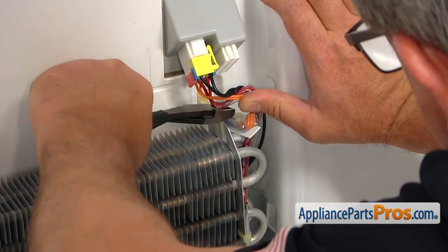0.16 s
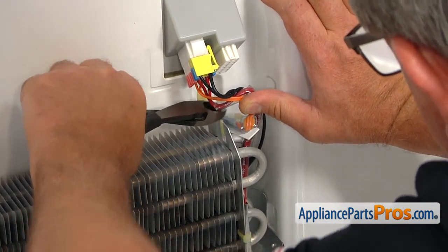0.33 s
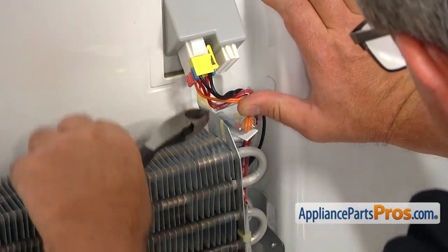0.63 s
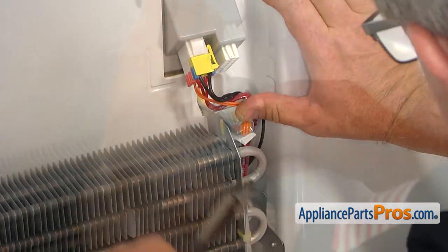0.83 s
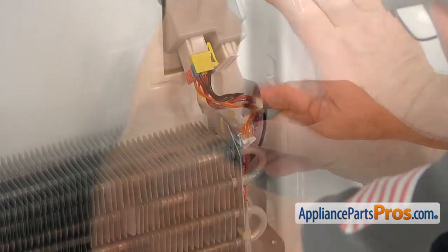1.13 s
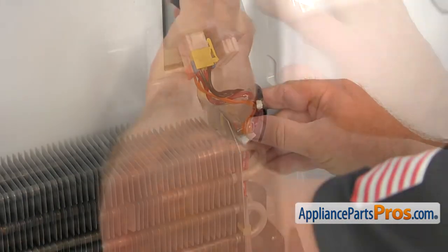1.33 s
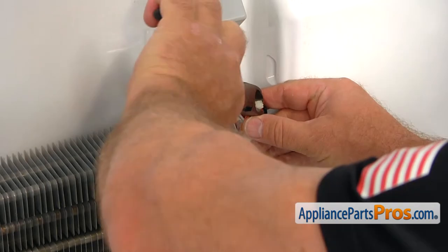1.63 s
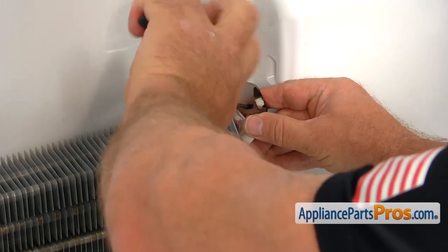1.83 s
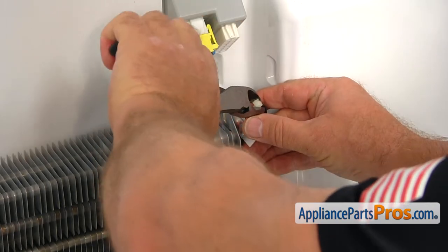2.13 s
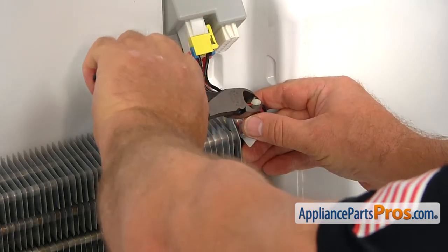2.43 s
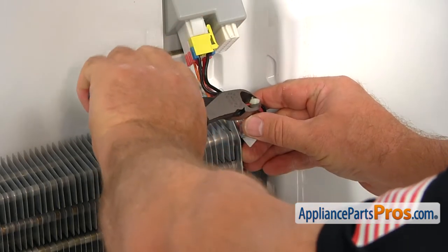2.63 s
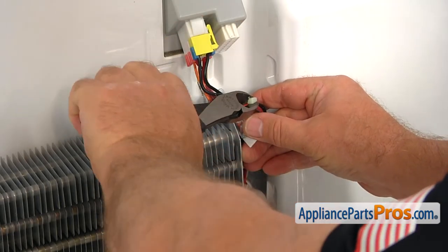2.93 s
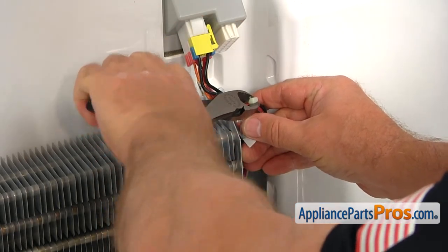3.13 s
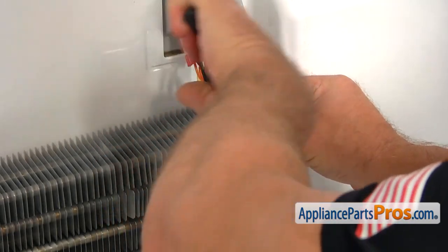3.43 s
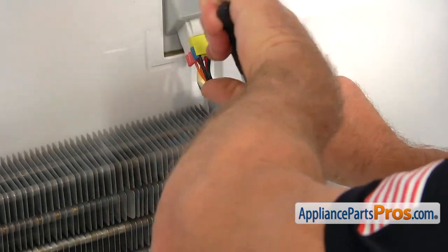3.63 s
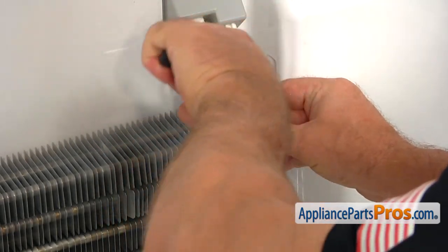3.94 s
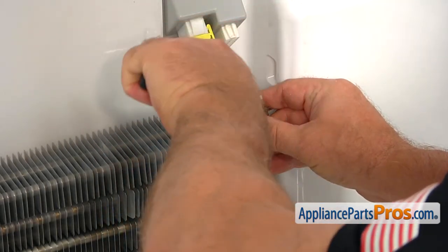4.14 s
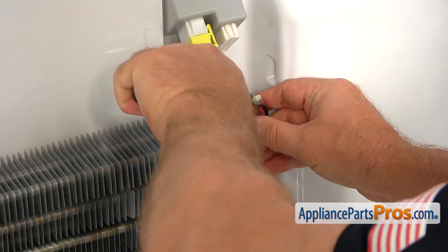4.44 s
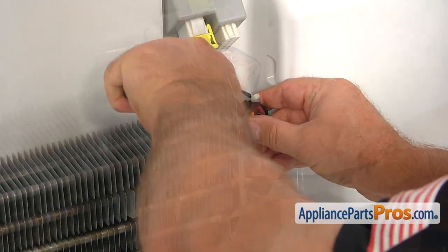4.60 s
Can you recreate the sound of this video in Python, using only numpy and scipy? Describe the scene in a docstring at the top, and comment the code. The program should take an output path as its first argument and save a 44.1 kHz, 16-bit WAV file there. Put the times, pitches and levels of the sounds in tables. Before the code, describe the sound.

Close inside an empty refrigerator compartment, side cutters snap a plastic tie almost immediately, with a hard bright crack, short boxy echo and faint coil ring. Hands then bump and rub the liner, with small tool ticks, muted hollow knocks and thin wire rustling, getting quieter. A second sharp double snap comes just before the end. Light steady stereo microphone hiss stays underneath.

```python
"""Side cutters snap two plastic ties inside an empty refrigerator cabinet.
Each snap is a few noise bursts that echo in the cabinet and ring its steel, panels and coil.
Between the snaps, hands shift wires and tool: short noise ticks, hollow ringing knocks,
rubbing and rustling from filtered noise, and a low boom of the cabinet.
A steady microphone hiss lies underneath, partly different on the left and right."""
import sys
import numpy as np
from scipy import signal
from scipy.fft import rfft, irfft
from scipy.io import wavfile

SR = 44100
rng = np.random.default_rng(int(sys.argv[2]) if len(sys.argv) > 2 else 0)


def natural_amplitude(level_db):
    """Convert a level in decibels to a linear amplitude factor, elementwise."""
    exponent = np.asarray(level_db, float) / 20
    return 10 ** exponent


def output_pcm(signal):
    """Save a mono or channel-first signal as 16-bit PCM at the path in sys.argv[1].

    Samples are clipped to [-1, 1] before scaling.
    """
    pcm = np.clip(np.atleast_2d(signal).T, -1, 1) * 32767
    wavfile.write(sys.argv[1], SR, np.round(pcm).astype(np.int16))


N = 210254  # length in samples

# Levels in these tables are relative: the functions below add their own gains.
# The ties part, then jaws and loose ends strike: start_s, crack_db, knock_db, boom_db, fade_ms
SNAP_HITS = [(0.043, -25, -41.5, -45.5, 1.7), (0.0733, -4.5, -24.5, -31.5, 2.2),
             (0.0746, -5, -21, -23, 1.4), (0.0802, -15.5, -26.5, -30.5, 3.9),
             (4.7195, -12.5, -29.5, -29.5, 1.5), (4.7218, -5.5, -26.5, -32.5, 1.7),
             (4.7272, -27, -27, -33.5, 0.77), (4.7325, -10, -34.5, -44, 0.354)]
# Colour of a snap: frequency_hz, level_db
CRACK_COLOUR = [(300, -19), (700, 0), (1900, -16.5), (3200, -2), (4600, 4), (6800, 1), (8800, 5.5),
                (10500, -5.5), (15000, -10), (17000, -6.5)]
# Ringing of the steel jaws and fins: pitch_hz, level_db, time_to_fall_60_db_s
JAW_MODES = [(2374, -8.5, 0.069), (3893, -15.5, 0.093), (4800, -14.5, 0.13), (6000, -13, 0.033),
             (6350, -3, 0.087), (7460, 0.5, 0.1), (8700, -20, 0.087), (9840, -5.5, 0.052),
             (9730, -11.5, 0.093), (10400, -13.5, 0.053), (13610, -13.5, 0.077), (12810, -13, 0.086)]
# Ringing of the cabinet's panels and coil: pitch_hz, level_db, time_to_fall_60_db_s
PANEL_MODES = [(60.4, -17.5, 0.38), (95.9, 2.5, 0.31), (145.53, -19, 0.89), (190, -7.5, 0.058),
               (205.5, -6, 0.31), (230.4, -8.5, 0.25), (297.7, -13, 0.72), (336.2, -14, .5),
               (463.4, -36, 0.26), (542, -38, 1.6), (620.6, -30, 0.27), (634.5, -20, 1.4), (669, -26.5, 1),
               (649.8, -30, 0.47), (710.7, -30, 0.94), (831, -25.5, 0.5), (926, -28, 0.5),
               (920, -31.5, 0.51), (1109, -21.5, 0.11), (1256.7, -33.5, 0.24), (1282, -33.5, 0.24),
               (1562, -27, 0.47), (1599, -33.5, 0.49), (1570, -29.5, .35), (1791, -30.5, .45),
               (1820, -28.5, .45), (2329, -30, 0.35)]
# How long the air in the cabinet echoes: frequency_hz, time_to_fall_60_db_s
CAVITY_DECAY = [(100, 0.14), (300, 0.26), (650, 0.19), (1100, 0.22), (1700, 0.1), (2300, 0.14), (3200, 0.1),
                (5000, .095), (8000, 0.067), (14000, 0.14)]
# Hard wire ends and tool tick on the walls: start_s, level_db, pitch_hz
TICK_HITS = [(0.323, -50.5, 3070), (0.7786, -43, 3530), (0.8131, -45, 5140), (0.8711, -53, 8540),
             (0.9263, -32, 8400), (1.054, -54.5, 4010), (1.301, -59, 5560), (1.4213, -46.5, 3530),
             (1.48, -57.5, 5500), (1.6323, -54.5, 7760), (1.74, -59, 8000), (1.793, -47.5, 5930),
             (1.955, -57, 11000), (2.0621, -50.5, 3500), (2.345, -58, 11000), (2.755, -62, 9000),
             (2.8378, -50, 4420), (3.155, -57.5, 12000), (3.1853, -52, 2346), (3.3092, -53, 3940),
             (3.439, -63.5, 5000), (3.65, -55, 6000), (3.721, -56.5, 7000), (3.892, -52.5, 7790),
             (4.155, -60, 8000), (4.2701, -57.5, 11500), (4.4042, -54.5, 7300), (4.5954, -55, 10400)]
# A wire creaks in quick slips: start_s, length_s, slips_per_s, level_db, pitch_hz
CREAK_RUNS = [(1.108, .05, 150, -53, 2500), (4.035, .09, 70, -59, 7500)]
# Knuckles and tool knock on the liner: start_s, level_db, pitch_hz
KNOCK_HITS = [(0.324, -57, 635), (0.7786, -66, 1674), (0.8126, -63.5, 610.5), (0.925, -57.5, 779),
              (0.9696, -57.5, 576.3), (1.054, -62.5, 507.6), (1.085, -60, 593.5), (1.1083, -65, 1594),
              (1.126, -57.5, 610.1), (1.422, -68, 571.5), (1.6323, -59, 422.7), (1.71, -71.5, 578),
              (1.8973, -60.5, 575.3), (1.9784, -66, 619), (2.0636, -64.5, 343), (2.3254, -58.5, 573.2),
              (2.8376, -68, 788), (2.9939, -74.5, 860), (3.1852, -66, 825.6), (3.3089, -62, 433),
              (3.3666, -61, 407.3), (3.4394, -66.5, 578.5), (3.6558, -69, 498), (3.8198, -70, 573),
              (4.0408, -68.5, 387), (4.1544, -74.5, 594), (4.269, -68, 613.4), (4.4031, -61.5, 600.3),
              (4.5941, -61, 588)]
# Hands shove the cabinet: peak_s, boom_db
SHOVE_PEAKS = [(.19, -33.5), (.29, -45), (.35, -41), (.4, -43.5), (1.03, -36.5), (1.169, -44.5),
               (1.431, -51), (1.789, -46.5), (1.98, -49.5), (2.11, -56.5), (2.47, -54.5), (2.76, -57),
               (2.908, -50), (3.021, -52), (3.33, -63.5), (3.679, -62), (4.67, -49), (4.72, -36.5)]
# Weight leaning on the cabinet: time_s, boom_db
LEAN_CURVE = [(0.0, -52), (0.29, -52.5), (0.4, -64), (0.61, -59.5), (0.77, -61.5), (1.11, -44.5),
              (1.5, -68.5), (1.71, -52.5), (1.84, -57), (1.92, -57.5), (2.08, -63), (2.68, -66.5),
              (2.96, -60), (3.65, -54), (3.95, -64.5), (4.25, -63.5), (4.54, -63), (4.7, -56.5)]
# Hands at work, dragging on the panels and scuffing on the liner: time_s, drag_db, scuff_db
RUB_CURVE = [(0.0, -49.5, -62), (0.16, -53.5, -43.5), (0.25, -56, -55.5), (0.38, -64.5, -63),
             (0.6, -78, -72.5), (0.82, -65, -69.5), (0.99, -56.5, -60), (1.12, -59, -75.5),
             (1.44, -72, -71.5), (1.67, -75.5, -86), (1.83, -66, -69.5), (2.11, -78, -80),
             (2.32, -64.5, -77.5), (2.51, -76.5, -85.5), (2.77, -77, -80.5), (3.23, -70, -72),
             (3.36, -59.5, -67), (3.48, -59, -64), (3.82, -75, -76.5), (4.21, -63.5, -73.5),
             (4.48, -79, -90.5), (4.7, -74, -75.5)]
# Low resonances under the hands: pitch_hz, width_hz, level_db
BOOM_MODES = [(33.2, 87, -5.5), (65, 23, -4), (91.11, 6.4, -6.5), (218.2, 38, -2.5), (318, 47, -11),
              (474, 170, -13.5), (589.3, 58, -13.5), (784, 110, -14), (1226.9, 240, -20), (1679, 67, -26)]
# Wires rustle: time_s, level_db
WIRE_CURVE = [(0, -75.5), (.7, -79), (.84, -72), (.9, -71), (.98, -68.5), (1.07, -71), (1.14, -73.5),
              (1.2, -71.5), (1.31, -68), (1.5, -72), (1.56, -78.5), (1.76, -69.5), (1.86, -75.5),
              (2.7, -77.5), (3.2, -76), (3.35, -72), (3.7, -76.5), (3.85, -74.5), (4.0, -76.5), (4.08, -75),
              (4.2, -75), (4.7, -78.5)]
# Colour of the rustle: frequency_hz, level_db
RUSTLE_COLOUR = [(1500, -0.5), (3000, -0.5), (6000, -1.5), (10000, -4), (15000, -6.5)]
# Colour of the hiss shared by left and right: frequency_hz, level_db
SHARED_HISS_COLOUR = [(180, -28.5), (300, -3), (398, -3), (946, -17), (1120, -9), (1580, -21), (13500, -16),
                      (16000, -18)]
# Colour of the hiss that differs between left and right: frequency_hz, level_db
APART_HISS_COLOUR = [(18, -22.5), (30, -4.5), (760, -9.5), (889, -7.5), (1010, -9.5), (7470, -8.5),
                     (16000, -9)]


def snaps(air):
    """The crack fills the cavity and rings the steel; the jolt shakes panels and coil."""
    crack, knock, boom, coil = np.zeros((4, N))
    grains = rng.standard_normal((len(SNAP_HITS), 600))
    for (s, crack_db, knock_db, boom_db, fade_ms), grain in zip(SNAP_HITS, grains):
        add(crack, natural_amplitude(crack_db) * burst(fade_ms, grain), s)
        add(knock, natural_amplitude(knock_db) * np.hanning(8), s)
        add(boom, natural_amplitude(boom_db) * np.hanning(60) / 30, s)
        add(coil, natural_amplitude(knock_db - 13.5) * np.hanning(8), s)

    hz = np.maximum(np.fft.rfftfreq(len(air), 1 / SR), 1)
    shape = irfft(natural_amplitude(at_hz(CRACK_COLOUR, hz)), len(air))
    colour = np.roll(shape, 32)[:64] * np.hanning(64)  # a short filter keeps the attack sharp
    echoes = signal.fftconvolve(crack, np.convolve(air, colour))
    bright = natural_amplitude(12.5) * echoes[32:N + 32]  # skip the filter's delay
    steel = natural_amplitude(-21) * rings(crack, JAW_MODES)

    dull = signal.sosfilt(signal.butter(2, [150, 2400], "band", fs=SR, output="sos"), knock)
    dull_direct = natural_amplitude(13) * dull
    dull_echo = natural_amplitude(12.5) * signal.fftconvolve(dull, air)[:N]
    return bright + steel + panels(boom, coil) + dull_direct + dull_echo


def panels(boom, coil):
    """A soft push rings the low panel modes; a sharper one rings the upper modes of the coil."""
    lower = rings(boom, [mode for mode in PANEL_MODES if mode[0] < 400])
    # the many alike fins split every upper mode into eight close neighbours
    neighbours = [(hz * (1 + 0.024 * offset), db, t60)
                  for hz, db, t60 in PANEL_MODES if hz > 400
                  for offset in rng.uniform(-1, 1, 8)]
    return lower + natural_amplitude(-7) * rings(coil, neighbours)


def cavity(rise_ms, direct_db):
    """Echoes pile up within milliseconds and die band by band; the direct click comes on top."""
    t = np.arange(SR // 2) / SR
    edges = 80 * 2 ** (np.arange(24) / 3)  # third-octave bands, in Hz
    white = rng.standard_normal((2, len(t)))
    out = np.zeros(len(t))
    for k, (low, high) in enumerate(zip(edges, edges[1:])):
        t60 = at_hz(CAVITY_DECAY, np.sqrt(low * high))
        dying = white[k % 2] * natural_amplitude(-60 * t / t60) * (1 - np.exp(-1000 * t / rise_ms))
        out += signal.sosfilt(signal.butter(2, [low, high], "band", fs=SR, output="sos"), dying)
    out /= np.sqrt(np.sum(out ** 2))
    out[0] += natural_amplitude(direct_db)
    return out


def touches(air):
    """Ticks sound both direct and through the cavity's echoes; knocks sound direct only."""
    bright = signal.sosfilt(signal.butter(2, 1300, "high", fs=SR, output="sos"), ticks())
    echo = natural_amplitude(13.5) * signal.fftconvolve(bright, air)[:N]
    return echo + natural_amplitude(7.5) * bright + natural_amplitude(3) * knocks()


def ticks():
    """A hard, tiny contact gives a short noise burst, stronger around its own pitch."""
    out = np.zeros(N)
    for s, db, hz in [*TICK_HITS, *creaks(), *faint(-63, low_hz=2500, high_hz=9000)]:
        hard = burst(0.63, rng.standard_normal(6000))
        add(out, natural_amplitude(db) * (0.47 * hard + resonance(hard, hz, 0.95 * hz)), s)
    return out


def creaks():
    """A wire sticks and slips: rows of ticks for each uneven run of slips."""
    return [(s + (k + rng.uniform(-0.11, 0.2)) / rate, db + rng.normal(0, 1.9), hz)
            for s, length, rate, db, hz in CREAK_RUNS
            for k in range(int(length * rate) + 1)]


def knocks():
    """A blow on the hollow liner rings three dying modes, and the loose wall buzzes along."""
    t60, rise_ms = 0.13, 1.5  # seconds to fall 60 dB, milliseconds to rise
    t = np.arange(6000) / SR
    click = 1.0 * (t == 0)
    out = np.zeros(N)
    for s, db, hz in [*KNOCK_HITS, *faint(-76, low_hz=403.2, high_hz=739.7)]:
        blow = rings(click, [(hz, 0, t60), (0.69 * hz, -5, 1.34 * t60), (1.1 * hz, -5, 0.5 * t60)])
        buzz = resonance(rng.standard_normal(len(t)), 0.902 * hz, 262)
        rattle = resonance(buzz, 1.088 * hz, 590) * natural_amplitude(-60 * t / t60)
        hollow = (blow + natural_amplitude(19.5) * rattle) * (1 - np.exp(-1000 * t / rise_ms))
        add(out, natural_amplitude(db) * hollow / np.sqrt(np.mean(hollow[:900] ** 2)), s)
    return out


def faint(db, low_hz, high_hz):
    """Unnoticed touches at chance times, about 3 per second: start_s, level_db, pitch_hz."""
    u = rng.random((40, 3))
    starts = np.cumsum(-np.log(1 - u[:, 0]) / 3.0)
    levels = db + 8 * (u[:, 1] - 0.5)
    pitches = low_hz * (high_hz / low_hz) ** u[:, 2]
    return [row for row in zip(starts, levels, pitches) if row[0] < N / SR]


def hands():
    """Lumpy pressure drives the cabinet's low resonances, while the wires rustle."""
    (lean_db,), (drag_db, scuff_db) = in_time(LEAN_CURVE), in_time(RUB_CURVE)
    lumps_db = [1.0 * drift(9), 1.5 * drift(14)]
    slow_push, quick_push = rng.standard_normal((2, N)) * natural_amplitude(lumps_db)
    lean = natural_amplitude(lean_db) * boom_modes(slow_push, 0, 150)
    shove = resonance(shoves() * boom_modes(slow_push, 50, 150), 84.8, 66)
    drag = natural_amplitude(drag_db) * boom_modes(quick_push, 150, 400)
    scuff = natural_amplitude(scuff_db) * boom_modes(quick_push, 400, 5000)
    return lean + shove + drag + scuff + rustle()


def boom_modes(force, low_hz, high_hz):
    """A noisy force sets off the cabinet resonances between two pitches; rms 1."""
    out = 0
    for hz, width, db in BOOM_MODES:
        if low_hz < hz < high_hz:
            band = resonance(resonance(force, hz, width), hz, 2 * width)
            out = out + natural_amplitude(db) * band / np.sqrt(width)
    return rms_one(out)


def shoves():
    """Strength of the shoves: each swells quickly to its peak and sinks a little slower."""
    rise, fall = 500, 357.5  # dB per second
    t = np.arange(N) / SR
    return sum(natural_amplitude(db - np.maximum((s - t) * rise, (t - s) * fall)) for s, db in SHOVE_PEAKS)


def rustle():
    """Wires scratch in clumps of tiny slips, and every slip dies away in the cavity."""
    (level_db,) = in_time(WIRE_CURVE)
    slips = rng.random(N) < 900 * natural_amplitude(1.5 * drift(15)) / SR  # around 900 slips per second
    tails = signal.lfilter([1], [1, -natural_amplitude(-60 / (0.06 * SR))], slips + 1e-9)  # 60 dB in 0.06 s
    scratch = coloured(tails * rng.standard_normal(N), [(700, -25), *RUSTLE_COLOUR])
    return natural_amplitude(level_db) * scratch


def hiss():
    """Steady microphone noise: one part shared, one part with opposite sign left and right."""
    shared, apart = rng.standard_normal((2, N))
    shared = natural_amplitude(-73.5) * coloured(shared, SHARED_HISS_COLOUR)
    apart = natural_amplitude(-73.5) * coloured(apart, APART_HISS_COLOUR)
    return shared + apart * [[1], [-1]]


def burst(ms, grains):
    """Noise that fades to about a third in the given milliseconds; energy 1."""
    x = grains * np.exp(-np.arange(len(grains)) * 1000 / SR / max(ms, 0.1))
    return x / np.sqrt(np.sum(x ** 2))


def rings(x, modes):
    """Every mode answers a push with a sine that dies."""
    out = 0
    for hz, db, t60 in modes:
        r, w = natural_amplitude(-60 / (t60 * SR)), 2 * np.pi * hz / SR
        out = out + signal.lfilter([0, natural_amplitude(db) * np.sin(w)], [1, -2 * r * np.cos(w), r * r], x + 1e-18)
    return out


def resonance(x, hz, width_hz):
    """A two-pole filter that favours one pitch, with gain 1 at its top."""
    r = np.exp(-np.pi * width_hz / SR)
    poles = [1, -2 * r * np.cos(2 * np.pi * hz / SR), r * r]
    return signal.lfilter([(1 - r * r) / 2, 0, (r * r - 1) / 2], poles, x + 1e-18)


def coloured(x, spectrum):
    """Give a noise a spectrum; rms 1."""
    hz = np.maximum(np.fft.rfftfreq(len(x), 1 / SR), 1)
    return rms_one(irfft(rfft(x) * natural_amplitude(at_hz(spectrum, hz)), len(x)))


def drift(rate_hz):
    """Slow random wandering; rms 1."""
    r = np.exp(-2 * np.pi * rate_hz / SR)
    noise = rng.standard_normal(N + SR)
    return rms_one(signal.lfilter([1], [1, -2 * r, r * r], noise)[SR:])  # drop the filter's start


def rms_one(x):
    """Scale to rms 1."""
    return x / np.sqrt(np.mean(x ** 2) + 1e-20)


def at_hz(points, hz):
    """Read a table on a log-frequency axis."""
    points = np.array(points)
    return np.interp(np.log(hz), np.log(points[:, 0]), points[:, 1])


def in_time(rows):
    """Columns of a curve at every sample."""
    s, *columns = np.transpose(rows)
    return [np.interp(np.arange(N) / SR, s, column) for column in columns]


def add(out, x, s):
    """Mix x into out from time s."""
    at = round(s * SR)
    out[at:at + len(x)] += x[:N - at]


def scene():
    """Snaps and touches share one cavity; with the hands, they sound alike on left and right."""
    air = cavity(rise_ms=0.76, direct_db=-5.5)
    return np.tile(snaps(air) + touches(air) + hands(), (2, 1))


def roll_off(x):
    """The treble ends steeply here."""
    return signal.sosfilt(signal.butter(12, 16660, fs=SR, output="sos"), x)


def record(dry):
    """The microphone adds its hiss, and a steep filter cuts the top of the treble."""
    noisy = dry + hiss()
    mix = signal.sosfilt(signal.cheby2(10, 60, 16900, fs=SR, output="sos"), noisy)
    return roll_off(mix)


dry = scene()
out = record(dry)
output_pcm(out)
```